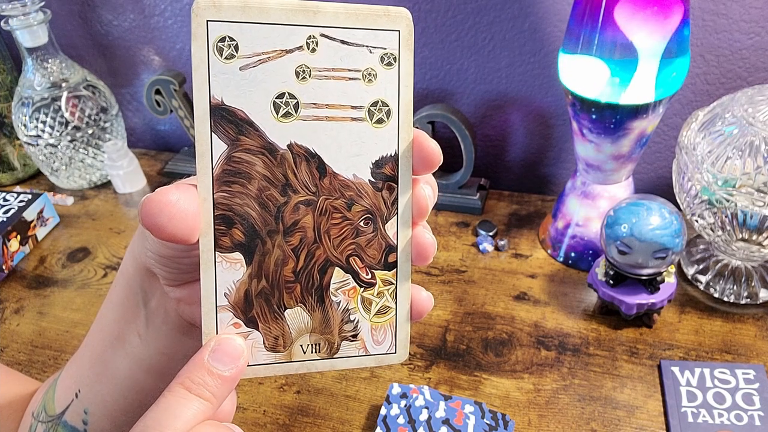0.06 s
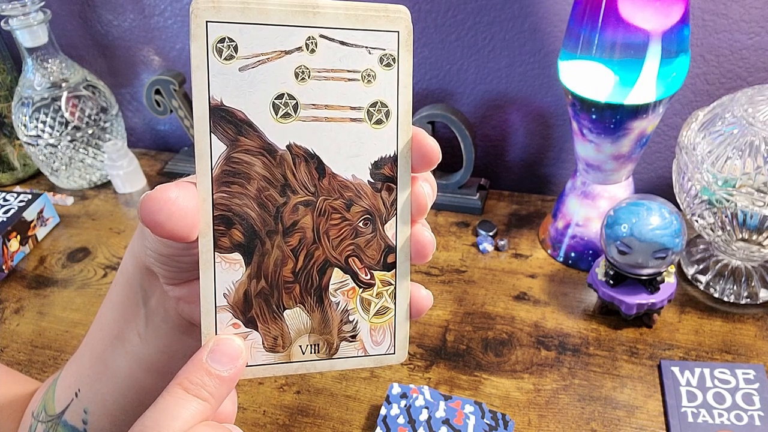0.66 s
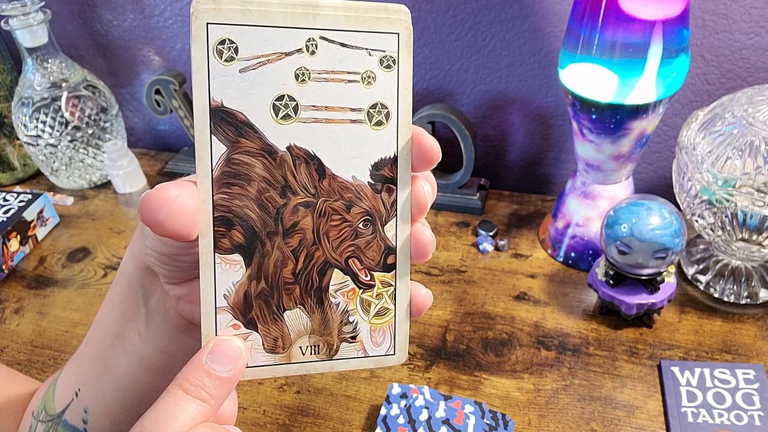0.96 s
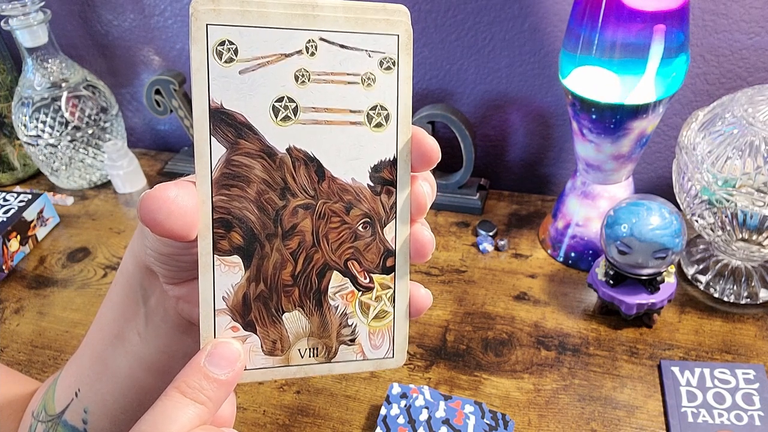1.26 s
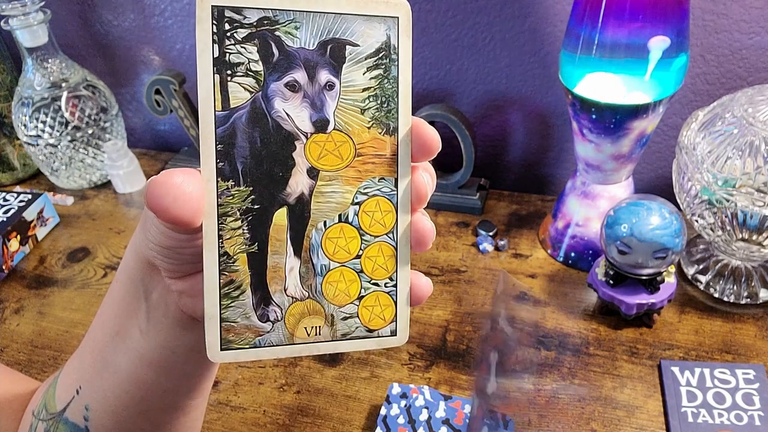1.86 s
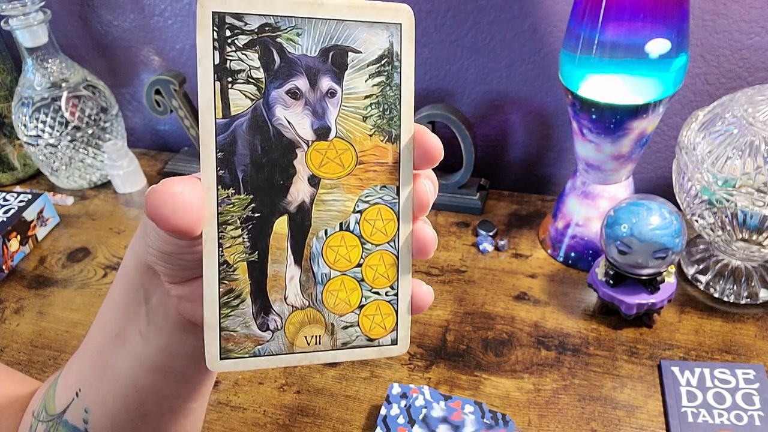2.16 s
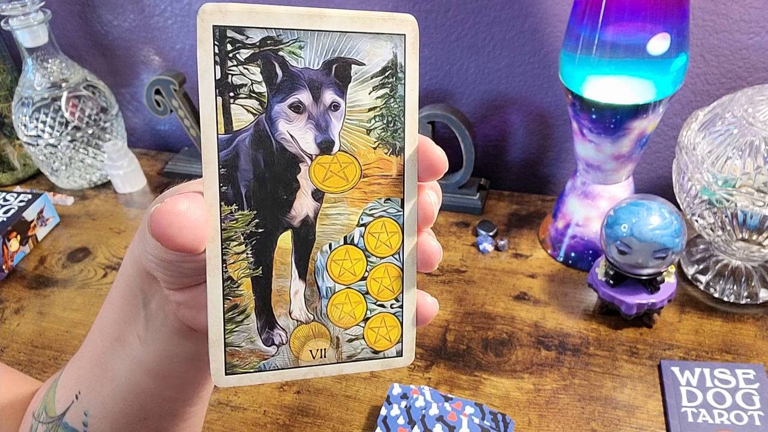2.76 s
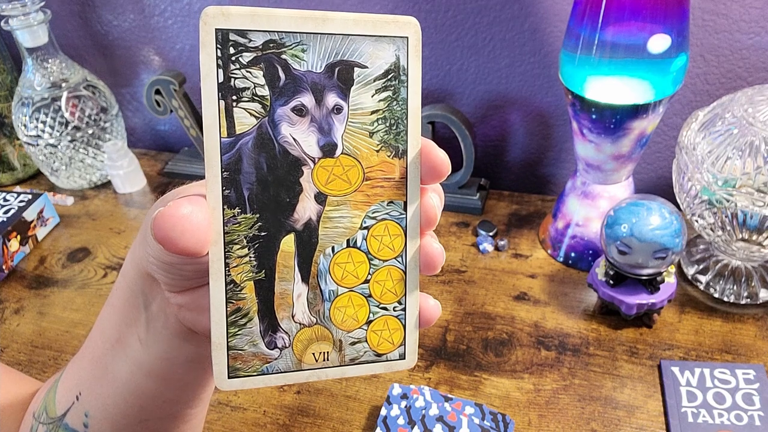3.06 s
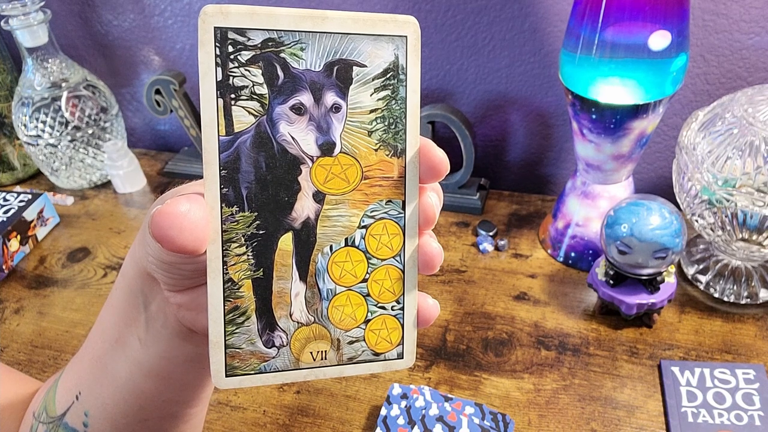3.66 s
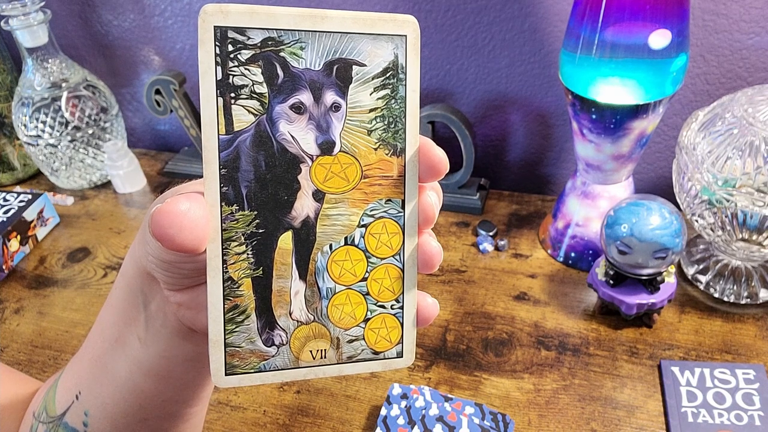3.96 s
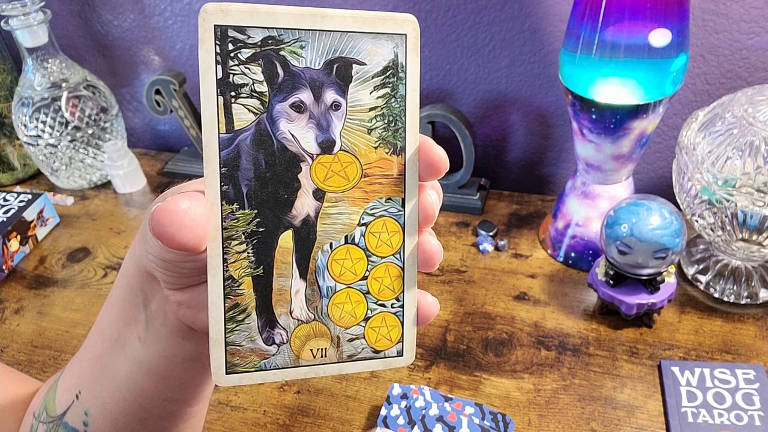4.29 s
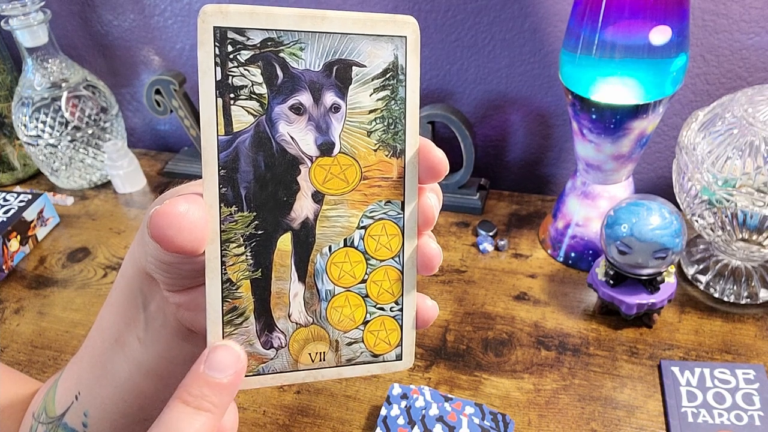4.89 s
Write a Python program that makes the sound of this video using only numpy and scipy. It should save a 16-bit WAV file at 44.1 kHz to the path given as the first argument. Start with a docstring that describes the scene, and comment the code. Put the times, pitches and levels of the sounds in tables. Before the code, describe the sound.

A stiff card slides off a hand-held deck with a hiss and light clicks, then snaps onto a wooden table in a quiet room.

```python
"""First comes a steady rush like ventilation, with mains hum, a thin whine and soft handling rumble.
Then, close by, a stiff card rubs and hisses as it slides off a hand-held deck. Its edge ticks and
scrapes, dull pats sound, and the bent card slips and snaps flat on a wooden table. The small room
answers briefly. A faint far drone swells and fades, with faint brushes and two tiny card ticks."""
import sys
import numpy as np
from scipy import signal
from scipy.fft import rfft, irfft, next_fast_len
from scipy.io import wavfile
from scipy.ndimage import uniform_filter1d

SR = 44100
rng = np.random.default_rng(int(sys.argv[2]) if len(sys.argv) > 2 else 0)


def generate_wav(signal):
    """Clip the signal to [-1, 1] and save it as 16-bit WAV at the path in sys.argv[1]."""
    frames = np.transpose(np.atleast_2d(signal))
    scaled = np.clip(frames, -1, 1) * 32767
    pcm = np.round(scaled).astype(np.int16)
    wavfile.write(sys.argv[1], SR, pcm)


N = 221643
TIME = np.arange(N) / SR


def amp(db):
    """Turn decibels into a gain."""
    return 10 ** (np.asarray(db) / 20)


def unit(x):
    """Scale a sound to an average (rms) level of 1."""
    return x / np.sqrt(np.mean(x ** 2))


def colour(x, points):
    """Shape the tone along a curve of (f/Hz, level/dB) points, with no ringing ahead of the sound."""
    hz, db = np.transpose(points)
    size = 2 * next_fast_len(len(x))
    freq = np.maximum(np.fft.rfftfreq(size, 1 / SR), 1)
    gain = amp(np.interp(np.log(freq), np.log(hz), db))
    cepstrum = irfft(np.log(gain))
    cepstrum[1:size // 2] *= 2
    cepstrum[size // 2 + 1:] = 0
    return irfft(rfft(x, size) * np.exp(rfft(cepstrum)))[:len(x)]


def band(x, hz, width_hz):
    """A resonance: lets through what lies near one frequency."""
    hz, width_hz = np.minimum([hz, width_hz], .45 * SR)
    return signal.lfilter(*signal.iirpeak(hz, hz / width_hz, fs=SR), x)


def steep_band(x, hz, width_hz):
    """The same resonance twice, for steeper sides."""
    return band(band(x, hz, width_hz), hz, width_hz)


def drift(rate_hz):
    """A smooth random wobble of about size 1."""
    hold = max(int(SR / rate_hz), 1)
    steps = np.repeat(rng.standard_normal(N // hold + 1), hold)[:N]
    return unit(uniform_filter1d(uniform_filter1d(steps, hold), hold))


def fade(t, t60):
    """Die away by 60 dB in t60 seconds, the "fade time" of the tables."""
    return np.exp(-np.log(1000) * t / t60)


def swell(peak_s, spread_s):
    """A smooth rise and fall, 1 at the peak."""
    return np.exp(-((TIME - peak_s) / spread_s) ** 2)


def add(out, start_s, sound):
    """Mix a sound in at a given time."""
    i = int(start_s * SR)
    out[i:i + len(sound)] += sound[:N - i]


# tone curves of the air's low rush and of its hiss: f/Hz, level/dB
AIR_RUSH = [(15, -51.5), (25, -24), (39, -9), (60, 1.5), (88, -5.5), (158, -4.5), (271, -13.5),
            (563, -14.5), (731, -12), (870, -17.5), (1520, -23.5), (1600, -29), (2080, -62.5), (3520, -120)]
AIR_HISS = [(1200, -18.5), (1600, 1.5), (1850, -3.5), (2300, -5), (3050, 1), (3700, -1), (5000, -5),
            (6850, -8), (7200, -15), (11000, -17), (16000, -18.5)]

def air(rush_db=-54.5, hiss_db=-68, flutter_db=-0.35):
    """Moving air: a low, slightly fluttering rush with a faint hiss above it."""
    rush = unit(colour(rng.standard_normal(N), AIR_RUSH)) * amp(rush_db + flutter_db * drift(9))
    hiss = unit(colour(rng.standard_normal(N), AIR_HISS)) * amp(hiss_db)
    return rush + hiss


# tones of appliances: f/Hz, level/dB, pitch wander as a share of f
HUMS = [(60.4, -63, 0.023), (129, -66, .04), (159.7, -65, 0.0396), (458, -73.5, 0.027), (733.5, -78, .04),
        (977, -74, .005), (994, -77, 0.00488), (1499, -73.5, .003), (3000, -82, .01)]

def hums(waver_db=1.7):
    """Appliances hum and whine, wavering a little in pitch and loudness."""
    out = np.zeros(N)
    for hz, db, wander in HUMS:
        pitch_hz = hz * (1 + wander * drift(30))
        tone = unit(np.sin(2 * np.pi * np.cumsum(pitch_hz) / SR))
        out += tone * amp(db + waver_db * drift(20))
    return out


# soft, deep swells of handling rumble: peak t/s, spread/s, level/dB
RUMBLES = [(0.071, 0.1, -56), (2.107, .25, -54), (2.7, .25, -55.5)]

def rumble():
    """Handling makes a soft, deep noise that comes and goes."""
    level = sum(amp(db) * swell(peak, spread) for peak, spread, db in RUMBLES)
    return unit(steep_band(rng.standard_normal(N), hz=75, width_hz=70)) * level


def friction(grain_db=1.5):
    """Paper fibres make countless tiny slips under a slightly uneven hand."""
    slips = rng.standard_normal(N) * amp(grain_db * drift(1500))
    return slips * amp(.9 * drift(70))


# strokes on deck and table, the long draw first: t/s, length/s, hiss level/dB, rasp level/dB
STROKES = [(1.534, .235, -55.5, -60.5), (1.747, .025, -68, -55.5), (1.83, 0.11, -69.5, -62),
           (1.98, .01, -57, -61), (2.14, .02, -74, -71), (2.296, 0.0067, -55.5, -52),
           (2.386, 0.022, -61.5, -54), (2.465, .02, -68, -58)]

def strokes(build_db_per_s=14.5, stop_db_per_s=320):
    """Hiss and rasp levels in dB: each stroke sets in, slowly gathers speed, then stops."""
    power = np.full((2, N), np.finfo(float).eps)
    for start, length, hiss_db, rasp_db in STROKES:
        left_s = start + length - TIME
        rise = fade(np.maximum(start - TIME, 0), .14 + 1.2 * length)  # long strokes set in more gently
        shape_db = -np.maximum(build_db_per_s * left_s, -stop_db_per_s * left_s)
        power += (rise * amp([hiss_db + shape_db, rasp_db + shape_db])) ** 2
    return 10 * np.log10(power)


# tone curves of the card's sliding face and scraping edge: f/Hz, level/dB
FACE_HISS = [(3000, -33), (6800, -13), (8000, -3), (9000, 1), (10200, -5), (12000, -13.5), (14000, -18),
             (16000, -27)]
EDGE_RASP = [(600, -1), (2000, -9), (3500, -2), (6000, -1.5), (8000, -6.5), (10000, -9), (11500, -21),
             (16000, -33.5)]

def slide(sheen_db=-7.5, brighten=1.7):
    """The glossy face hisses, brighter the faster it goes; the edge rasps lower as it bears down."""
    hiss_db, rasp_db = strokes()
    hiss = unit(colour(friction(), FACE_HISS)) * amp(hiss_db)
    sheen = unit(steep_band(friction(), hz=12000, width_hz=4500))
    sheen *= amp(hiss_db.max() + sheen_db + brighten * (hiss_db - hiss_db.max()))
    rasp = unit(colour(friction(), EDGE_RASP)) * amp(rasp_db)
    return hiss + sheen + rasp


# the room's echoes compared with the direct sound: f/Hz, level/dB
ROOM_TONE = [(80, -12), (220, -1), (450, -0.5), (1100, -1), (2000, -4.5), (3200, -9), (6000, -10),
             (8200, -9), (9700, -14), (11800, -4), (15000, -11.5)]

def room(x, tail_db=-22, build_s=.004):
    """Quick echoes from the table and nearby things, then a weaker, duller tail."""
    t = TIME[:SR // 2]
    early, tail = rng.standard_normal((2, len(t)))
    tail = signal.lfilter(*signal.butter(3, 6000, fs=SR), tail)
    echoes = early * fade(t, t60=.2) + amp(tail_db) * tail * fade(t, t60=1)
    echoes *= np.minimum(t / build_s, 1) ** 2
    return signal.oaconvolve(x, colour(echoes / np.linalg.norm(echoes), ROOM_TONE))[:N]


def paper_chatter(t, t60):
    """Paper chatters without a pitch: a short burst of dying noise."""
    shape = fade(t, t60) * (1 - fade(t, .003))
    x = rng.standard_normal(len(t)) * shape
    for _ in range(12):
        x = irfft(np.exp(1j * np.angle(rfft(x))), len(t))  # make all frequencies equally strong
        loudness = np.maximum(uniform_filter1d(np.abs(x), size=32), np.finfo(np.float32).eps)
        x = x * shape / loudness
    return x / np.linalg.norm(x)


def contacts(rows, shift_s):
    """Each touch ticks and chatters. They lie apart on the card, so arrivals shift by about shift_s."""
    out, t = np.zeros(N), TIME[:SR // 10]
    for start, db, hz, width_hz, chatter_db, t60 in rows:
        tick = steep_band(signal.unit_impulse(len(t)), hz, width_hz)
        chatter = steep_band(paper_chatter(t, t60), hz, width_hz)
        touch = 2 * (tick + amp(chatter_db) * chatter) / np.linalg.norm(tick)
        add(out, start + shift_s * rng.standard_normal(), amp(db) * touch)
    return out


# the edge catching on deck or table: t/s, level/dB, f/Hz, chatter level/dB
EDGE_CLICKS = [(1.8700, -39, 6000, 7.5), (1.8880, -39, 6000, 7.5), (1.9202, -42, 6000, 12),
               (1.962, -33, 10900, 11), (1.9662, -22.5, 6840, 8), (2.1252, -38.5, 4000, -5)]
# a corner flicking the table: t/s, tick level/dB, shudder level/dB
CORNER_FLICKS = [(2.2140, -21.5, -26), (2.2516, -23, -35)]
# a flick's tick and the shudder after it: f/Hz, width/Hz, chatter level/dB, chatter fade time/s
CORNER_TICK = (7370, 4070, 1, .012)
CORNER_SHUDDER = (2800, 3810, 4.5, .044)
# the notes at which the loosely held card bends: f/Hz, width/Hz, level/dB
CARD_NOTES = [(1410, 130, -1), (2040, 120, -1), (2290, 130, -1), (3380, 200, 5.5), (3800, 180, 0),
              (4640, 200, -1.5), (5200, 200, 0)]

def clicks(shift_s, gain_db=-1.5, width_ratio=2.14, chatter_fade_s=.023, shudder_lag_s=.0011):
    """Light touches of the edge and corner set the loose card ringing."""
    edges = [(start, db, hz, width_ratio * hz, chatter_db, chatter_fade_s)
             for start, db, hz, chatter_db in EDGE_CLICKS]
    ticks = [(start, db, *CORNER_TICK) for start, db, _ in CORNER_FLICKS]
    shudders = [(start + shudder_lag_s, db, *CORNER_SHUDDER) for start, _, db in CORNER_FLICKS]
    touches = contacts(edges + ticks + shudders, shift_s)
    ring = sum(amp(db) * band(touches, hz, width) for hz, width, db in CARD_NOTES)
    return amp(gain_db) * (touches + ring)


# dull pats of card and fingers, higher when harder: t/s, level/dB, centre f/Hz
PATS = [(1.8880, -28, 880), (1.8890, -34, 477), (1.9691, -21, 494.5), (1.9700, -25, 760),
        (1.9878, -29, 145), (1.9915, -31, 450), (2.2145, -25, 1150), (2.2241, -26, 130),
        (2.2281, -24.5, 680), (2.4932, -11.5, 400)]
# the notes of card, trapped air and wood together: f/Hz, level/dB, fade time/s
PAT_NOTES = [(143.9, 0, 0.058), (208, -8.5, 0.22), (395, 1, 0.017), (474, -1, .035), (740, 0.5, .015),
             (890, 0, 0.022)]

def pats(rise_s=.008, fall_db_per_octave=21):
    """Each soft blow rings low, short notes, favouring those near its centre frequency."""
    out, t = np.zeros(N), TIME[:SR // 5]
    for start, db, centre_hz in PATS:
        ring = np.zeros(len(t))
        for hz, note_db, t60 in PAT_NOTES:
            octaves_away = abs(np.log2(hz / centre_hz))
            strength = amp(note_db - fall_db_per_octave * octaves_away)
            ring += strength * np.sin(2 * np.pi * hz * t) * fade(t, t60)
        add(out, start, amp(db) * ring * (1 - fade(t, rise_s)))
    return out


# the hits within the snap: t/s, level/dB, f/Hz, width/Hz, chatter level/dB, chatter fade time/s
SNAP_HITS = [(2.4915, -14, 8500, 5400, 0.5, 0.0041), (2.4925, 3.5, 9350, 2097, -4.5, 0.035),
             (2.4945, -1.5, 6840, 6200, 2.5, 0.0093), (2.4943, -13, 3400, 2600, 6, .015),
             (2.4946, -17.5, 1130, 1300, -1, 0.016)]

def snap(shift_s):
    """The bent card slips, lets go and slaps the wood, which stills it at once."""
    return contacts(SNAP_HITS, shift_s)


# how strongly the card gives off its clicks and snap: f/Hz, level/dB
CARD_TONE = [(100, -8.5), (500, 10.5), (2000, 1), (6000, -0.5), (10000, -3), (11300, -9.5), (14000, -6.5),
             (16000, -16)]

def card_cracks(directions=3, shift_s=.0004):
    """The clicks and snap sound different in each direction; the room blends them into a smooth tail."""
    echoes = sum(room(clicks(shift_s) + snap(shift_s)) for _ in range(directions))
    direct = clicks(0) + snap(0)
    return colour(direct + echoes / np.sqrt(directions), CARD_TONE)


# the drone's bands of noise: f/Hz, width/Hz, level/dB
DRONE_BANDS = [(476.7, 39.8, 0.5), (618, 27, 0), (671.7, 11, -5), (738.3, 80, -1), (1090, 89, -10.5),
               (1240, 89, -15.5)]
# the drone drawing near and moving off: peak t/s, level/dB, (time to drop 3 dB)/s
DRONE_PASSES = [(2.38, -57, 0.06), (3.39, -56.5, 0.64)]

def drone(tone_hz=724, wander=.0073):
    """A far drone, like traffic behind a wall: it swells as it nears, and a tone emerges at the peaks."""
    noise = rng.standard_normal(N)
    passes = [amp(db) / np.hypot(1, (TIME - peak) / drop_s) for peak, db, drop_s in DRONE_PASSES]
    level = np.max(passes, axis=0)
    bands = unit(sum(amp(db) * steep_band(noise, hz, width) for hz, width, db in DRONE_BANDS))
    pitch_hz = tone_hz * (1 + wander * drift(15))
    tone = unit(np.sin(2 * np.pi * np.cumsum(pitch_hz) / SR))
    tone_level = level.max() * (level / level.max()) ** 8
    return bands * level + tone * tone_level


# faint brushes and two tiny ticks of the cards: peak t/s, spread/s, level/dB, f/Hz, width/Hz
BRUSHES_AND_TICKS = [(3.158, 0.051, -74.5, 7600, 1400), (3.17, .05, -73, 5440, 1000),
                     (3.476, .005, -61.5, 3600, 2500), (3.503, 0.043, -74, 7090, 4000),
                     (3.597, .009, -61, 3400, 1800), (4.221, 0.086, -75.5, 6330, 500)]

def brushes_and_ticks():
    """Brief swells of rubbing make faint brushes; the two shortest are tiny ticks of the cards."""
    rub = friction(grain_db=4)
    return sum(amp(db) * swell(peak, spread) * unit(steep_band(rub, hz, width))
               for peak, spread, db, hz, width in BRUSHES_AND_TICKS)


def scene(pat_echo_db=-4):
    """The cards close by, their echoes, handling rumble and the background, in one channel."""
    rubbing = slide() + brushes_and_ticks()
    thuds = pats()
    echoes = room(rubbing + amp(pat_echo_db) * thuds)
    cards = card_cracks() + rubbing + thuds + echoes
    return (cards + air() + hums() + rumble() + drone())[None]


def record(dry):
    """Cut the deepest rumble, below 35 Hz, and the highest treble, above 15800 Hz."""
    dry = signal.sosfilt(signal.butter(2, 35, "high", fs=SR, output="sos"), dry)
    return signal.sosfilt(signal.ellip(10, .2, 80, 15800, fs=SR, output="sos"), dry)


dry = scene()
out = record(dry)
generate_wav(out)
```